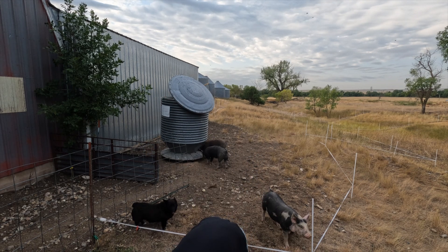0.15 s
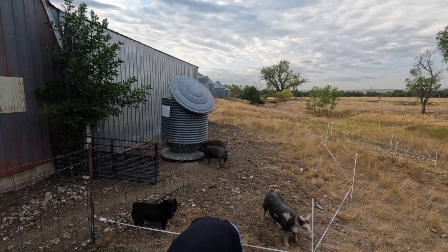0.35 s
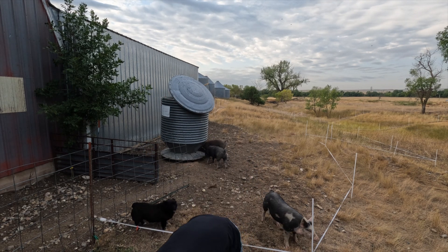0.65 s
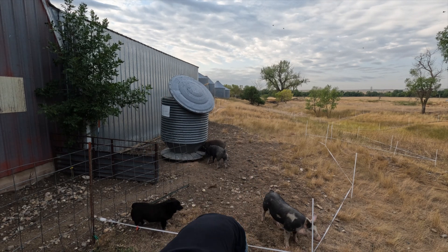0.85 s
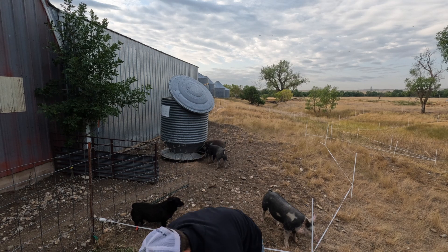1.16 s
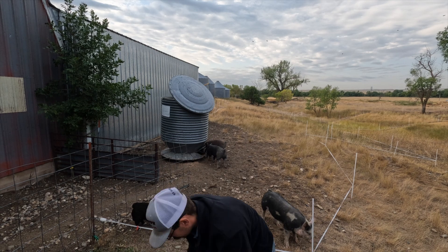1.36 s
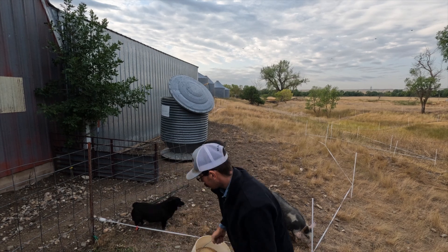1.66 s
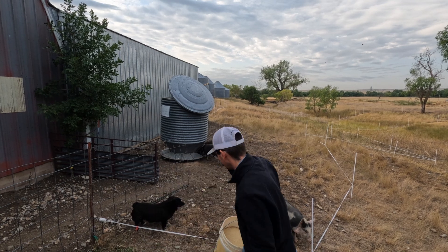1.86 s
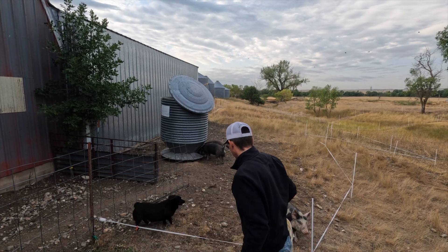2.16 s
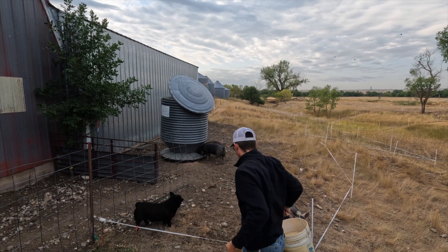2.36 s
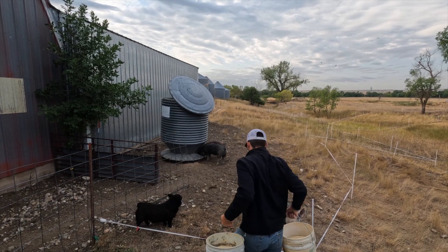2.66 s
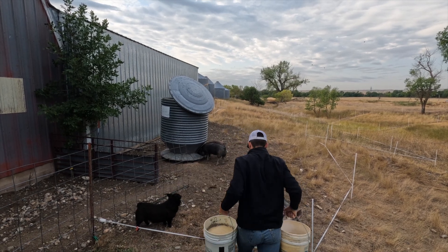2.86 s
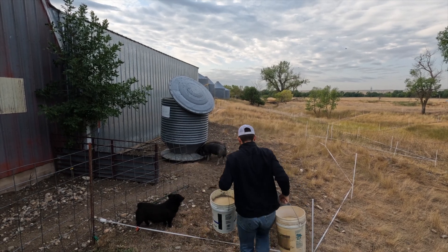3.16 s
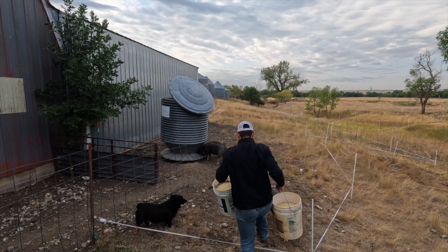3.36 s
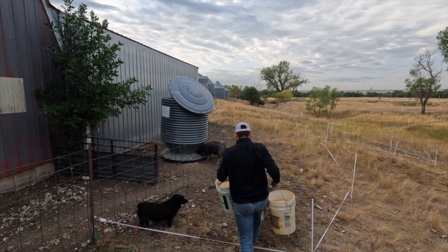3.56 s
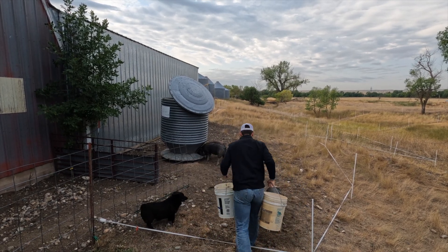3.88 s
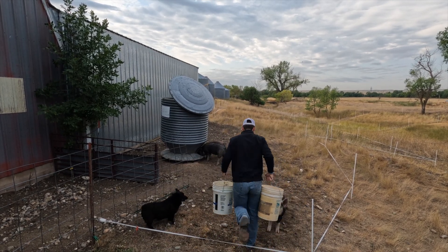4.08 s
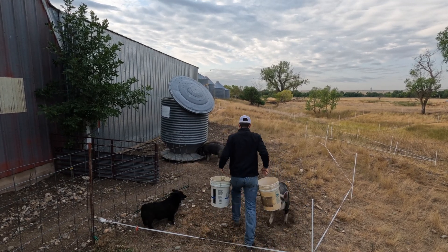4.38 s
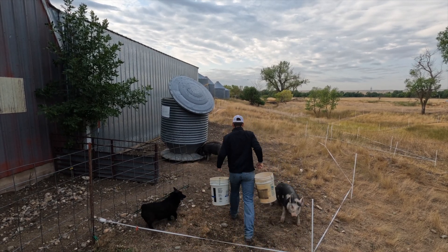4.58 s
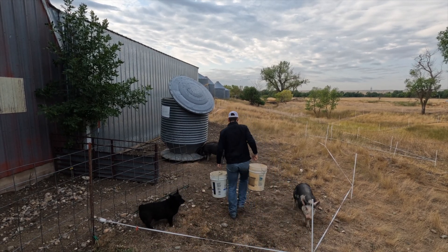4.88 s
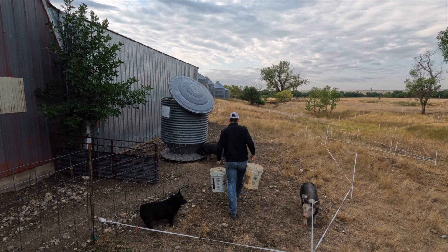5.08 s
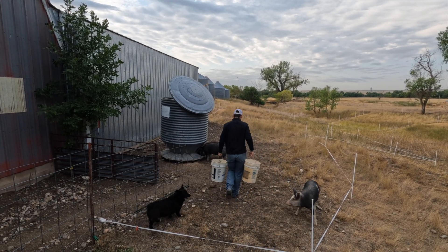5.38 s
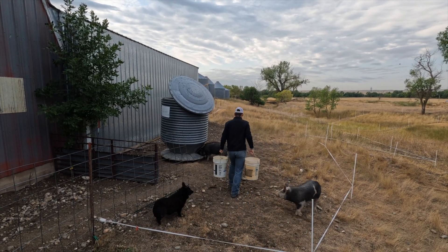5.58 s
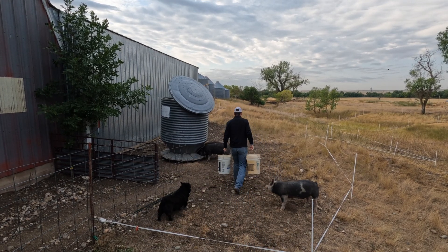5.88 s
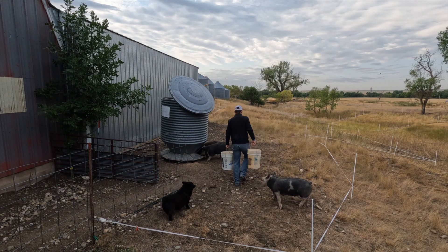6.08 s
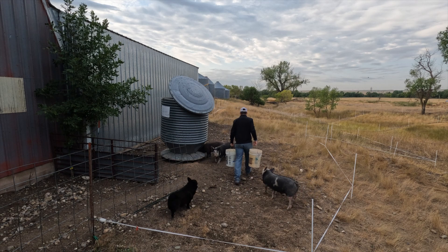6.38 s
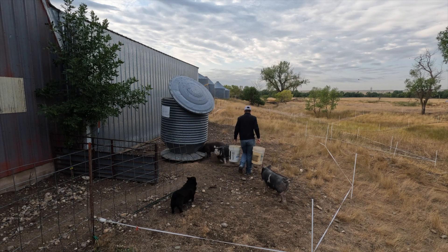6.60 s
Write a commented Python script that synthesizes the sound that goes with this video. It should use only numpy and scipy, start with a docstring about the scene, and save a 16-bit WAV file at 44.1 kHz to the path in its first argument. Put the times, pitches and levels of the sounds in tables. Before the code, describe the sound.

Outdoors beside a steel barn, low wind and faint birds come first, with soft footsteps and a pig's short dry grunts. Hollow feeder flaps clatter around one second, with a bucket knock and snout scrapes. Sparse grunts, gritty boot steps and low wind buffets follow. Near the end the feeder rattles again, a pig squeals hoarsely, and a loud metal clang rings out. The stereo microphone stays still, catching wind.

```python
"""Low wind and faint birdsong come first, then a light footstep and a pig's short rattling grunts.
Soon pigs root at a sheet-metal feeder beside a steel barn: noise bursts shake a hollow bin, then one loud clang.
Grunts are throat pulses ringing in snout and chest; boots are a snap, crunching grit and a thud.
Birds are gliding tones with echoes; wind, rumble and grass hiss are bands of coloured noise."""
import sys
import numpy as np
from scipy import signal
from scipy.io import wavfile

SR = 44100
rng = np.random.default_rng(int(sys.argv[2]) if len(sys.argv) > 2 else 0)


def output_pcm(signal):
    """Save a mono or channel-first signal as 16-bit PCM at the path in sys.argv[1].

    Samples are clipped to [-1, 1] before scaling.
    """
    pcm = np.clip(np.atleast_2d(signal).T, -1, 1) * 32767
    wavfile.write(sys.argv[1], SR, np.round(pcm).astype(np.int16))


N = 297234
T = np.arange(N) / SR   # time of every sample [s]


def from_db(db):
    """Turn decibels into a gain."""
    return 10 ** (np.asarray(db) / 20)


def rms_one(x):
    """Scale a sound to an average strength (rms) of 1."""
    return x / np.sqrt(np.mean(x ** 2) + 1e-20)


def in_time(rows):
    """Read a time table at every sample, with straight lines between its rows."""
    times, *columns = np.transpose(rows)
    return [np.interp(T, times, column) for column in columns]


def at_hz(points, hz):
    """Read a frequency table at the given pitch, with even steps per octave."""
    table_hz, *columns = np.transpose(points)
    return [np.interp(np.log(hz), np.log(table_hz), column) for column in columns]


def cut(x, hz, kind, order=2):
    """Keep only the lows, the highs or a band (Butterworth filter)."""
    sos = signal.butter(order, np.clip(hz, 10, .45 * SR), kind, fs=SR, output="sos")
    return signal.sosfilt(sos, x + 1e-18)


def drift(rate, size=N):
    """Wander at random: straight lines join chance points of spread 1, `rate` points a second."""
    points = rng.standard_normal(int(size * rate / SR) + 2)
    return np.interp(np.arange(size) * rate / SR, np.arange(len(points)), points)


def ring(x, hz, width_hz):
    """Ring at one pitch when struck, like a resonance; a wider one dies sooner."""
    radius = np.exp(-np.pi * width_hz / SR)
    angle = 2 * np.pi * hz / SR
    return signal.lfilter([0, np.sin(angle)], [1, -2 * radius * np.cos(angle), radius * radius], x + 1e-18)


def dying(t, t60):
    """Fade away smoothly, losing 60 dB in t60 seconds."""
    return np.exp(-np.log(1000) * t / t60)


def add(out, s, x):
    """Mix a sound in at its time."""
    i = int(np.clip(round(s * SR), 0, N - 1))
    out[..., i:i + x.shape[-1]] += x[..., :N - i]


def grains(size, spread_db):
    """Many tiny contacts of uneven strength, packed into a noise of rms 1."""
    strength = from_db(spread_db * np.tanh(drift(1200, size=size)))
    return rms_one(rng.standard_normal(size) * strength)


def placed(x, pan_db):
    """Lean a sound to the left (+) or right (-)."""
    return x * from_db(np.array([[pan_db], [-pan_db]]) / 2)


EDGES_HZ = 18 * 2 ** np.arange(0, 10.1, .5)   # half-octave band edges


def bands(spectrum, likeness, size):
    """Split stereo noise into half-octave bands of rms 1: (centre [Hz], gain, noise)."""
    white = rng.standard_normal((2, 2, size + SR // 4))   # the extra start lets the filters settle
    for k, (low, high) in enumerate(zip(EDGES_HZ, EDGES_HZ[1:])):
        hz = np.sqrt(low * high)
        if spectrum[0][0] < hz < spectrum[-1][0]:
            mid, side = cut(white[k % 2], [low, high], "band")[:, -size:]
            alike = np.clip(at_hz(likeness, hz)[0], -1, 1)
            pair = np.sqrt(1 + alike) * mid + np.sqrt(1 - alike) * np.array([side, -side])
            power = np.mean(from_db(at_hz(spectrum, np.linspace(low, high))[0]) ** 2)
            yield hz, np.sqrt(power * (high - low)), rms_one(pair)


# How alike left and right are in the open air: (frequency [Hz], likeness [0 to 1])
AIR_LIKENESS = [(60, 0.74), (150, 1), (400, 0.85), (1000, 0.7), (3000, 0.57), (13000, 0.61)]


def steady(spectrum, flicker_db, rate):
    """Lasting coloured stereo noise whose bands flicker separately; rms 1."""
    total = 0
    for _, gain, noise in bands(spectrum, AIR_LIKENESS, N):
        total = total + gain * from_db(flicker_db * drift(rate)) * noise
    return rms_one(total)


# Colour of the low rumble: (frequency [Hz], level per Hz [dB])
RUMBLE_COLOUR = [(90, -4), (140, 1.5), (250, -8.5), (380, -16), (550, -24)]
# Colour of the dry grass hiss: (frequency [Hz], level per Hz [dB])
GRASS_COLOUR = [(400, -9), (600, -4), (850, -54), (1100, -2.5), (1800, -11), (2600, -6.5), (4000, -11),
                (7200, -15), (8300, -46), (15000, -20)]


def pasture():
    """A low rumble grows with the breeze, over a lightly flickering hiss of dry grass."""
    rumble_db = -32 + 0.47 * in_time(BREEZE_STRENGTH)[0]
    rumble = from_db(rumble_db) * steady(RUMBLE_COLOUR, flicker_db=4.0, rate=13)
    hiss = cut(steady(GRASS_COLOUR, flicker_db=2.5, rate=24), 13500, "low")
    return rumble + from_db(-60.0) * hiss


# Strength of the breeze, before gain: (time [s], level [dB])
BREEZE_STRENGTH = [(0.0, -46), (1.11, -42), (1.18, -39), (2.25, -37), (2.5, -45), (3.04, -39.5),
                   (4.39, -49), (5.56, -36.5), (6.74, -35.5)]
# Colour of wind at the microphone: (frequency [Hz], level per Hz [dB])
WIND_COLOUR = [(17, 7), (50, 5), (80, -10.5), (130, -11)]
BREEZE_GAIN_DB = 3


def breeze():
    """Swirls of air at the microphone make a lumpy bed of low noise."""
    level_db = in_time(BREEZE_STRENGTH)[0] + BREEZE_GAIN_DB
    return from_db(level_db) * steady(WIND_COLOUR, flicker_db=5.5, rate=8.5)


# Gusts striking the microphone: (time at the middle [s], level [dB], upper edge [Hz])
GUSTS = [(0.693, -39, 109), (2.327, -29.5, 61.7), (2.707, -28, 55), (3.093, -27, 55), (3.241, -32, 64),
         (3.48, -32.5, 69.5), (5.345, -26, 59.6), (5.448, -18.5, 98)]
GUST_S = 0.021   # spread of each bell-shaped swell


def gusts():
    """Single buffets on the microphone: brief swells of very low noise."""
    out, t = np.zeros(N), T[:SR // 2] - 1 / 4
    shape = np.exp(-(t / GUST_S) ** 2 / 2)
    for s, db, edge_hz in GUSTS:
        eddy = cut(cut(rng.standard_normal(len(t)), edge_hz, "low", order=3), 8.6, "high")
        add(out, s - 1 / 4, from_db(db) * rms_one(eddy * shape) * np.sqrt(np.mean(shape ** 2)))
    return out


def glides(rows):
    """Gliding tones with a fast, uneven trill in pitch and a slightly wavering level."""
    out = np.zeros(N)
    for s, length, start_hz, end_hz, db, warble in rows:
        u = np.linspace(0, 1, int(length * SR))   # progress through the note
        trill = np.sin(2 * np.pi * 85 * u * length + drift(61.3, size=len(u))) + 0.6 * drift(604, size=len(u))
        hz = start_hz * (end_hz / start_hz) ** u * (1 + warble * trill)
        swell = np.sqrt(np.abs(np.sin(np.pi * u))) * from_db(3.3 * drift(73.4, size=len(u)))
        add(out, s, from_db(db) * np.sqrt(2) * swell * np.sin(2 * np.pi * np.cumsum(hz) / SR))
    return out


# One bird's sinking whistles: (time [s], length [s], start pitch [Hz], level [dB])
WHISTLES = [(0.145, 0.35, 3183, -66.5), (0.717, 0.18, 3050, -62), (3.397, 0.22, 3227, -69),
            (4.098, 0.052, 3320, -60), (4.722, 0.212, 3280, -63), (4.911, 0.15, 3045, -62.5)]
WHISTLE_SAG_HZ_PER_S2 = 2200   # the drop grows with the square of the length
# Another bird's short falling chirps: (time [s], length [s], top pitch [Hz], level [dB])
CHIRPS = [(0.242, 0.06, 4500, -69.5), (1.599, 0.076, 4356, -54), (1.671, 0.042, 3920, -60),
          (2.902, 0.06, 5570, -65.5), (4.387, 0.024, 5000, -61)]
CHIRP_FALL_OCTAVES_PER_S = 4
FULL_CHIRP_S = 0.13   # a chirp this long has the full warble
# Its flutters, trilling widely around a steady pitch: (time [s], length [s], pitch [Hz], level [dB])
FLUTTERS = [(.275, 0.059, 3900, -69), (.4, 0.054, 3290, -63), (2.067, .055, 3900, -61.5),
            (3.683, 0.079, 3950, -67), (5.42, 0.073, 3850, -64.5)]
# Notes of its quick twitter: (time after the start [s], length [s], start [Hz], end [Hz], relative level [dB])
TWITTER_NOTES = [(0, .055, 5240, 4830, -3), (.01, .075, 4500, 3456, 0), (.025, .03, 3150, 3600, 1),
                 (0.077, 0.0505, 3250, 2950, -4)]
# When it twitters: (time [s], level [dB])
TWITTERS = [(1.828, -52), (4.131, -53), (5.755, -58)]
# Warbles, as a share of pitch
WHISTLE_WARBLE, CHIRP_WARBLE, FLUTTER_WARBLE, TWITTER_WARBLE = 0.015, 0.1, 0.088, 0.044


def song():
    """Whistles sink, chirps fall and trill wider when longer, flutters stay level, twitters repeat a phrase."""
    notes = []
    for s, length, hz, db in WHISTLES:
        notes.append((s, length, hz, hz - WHISTLE_SAG_HZ_PER_S2 * length ** 2, db, WHISTLE_WARBLE))
    for s, length, hz, db in CHIRPS:
        end_hz = hz / 2 ** (CHIRP_FALL_OCTAVES_PER_S * length)
        notes.append((s, length, hz, end_hz, db, CHIRP_WARBLE * (length / FULL_CHIRP_S) ** 2))
    for s, length, hz, db in FLUTTERS:
        notes.append((s, length, hz, hz, db, FLUTTER_WARBLE))
    for s, db in TWITTERS:
        for delay, length, start_hz, end_hz, note_db in TWITTER_NOTES:
            notes.append((s + delay, length, start_hz, end_hz, db + note_db, TWITTER_WARBLE))
    return glides(notes)


def birds():
    """Far birdsong, smeared by echoes from the barn: a fading burst of noise stands for the echoes."""
    calls = song()
    mid, side = rng.standard_normal((2, SR)) * dying(T[:SR], .32)
    echoes = rms_one(mid + 0.65 * np.array([side, -side])) / np.sqrt(SR)
    return calls + from_db(4.5) * signal.fftconvolve(calls[None], echoes)[:, :N]


# Legs and boots brush through dry grass: (time at the middle [s], length [s], level [dB])
SWISHES = [(2.678, 0.0086, -53), (4.019, 0.03, -54), (4.348, 0.052, -55), (5.284, 0.047, -59)]


def swishes():
    """Dry stalks rub in a soft swell of grains."""
    out, t = np.zeros(N), T[:SR // 2] - 1 / 4
    for s, length, db in SWISHES:
        rustle = rms_one(cut(cut(grains(len(t), 2.9), [600, 5000], "band", order=1), 5900, "low"))
        add(out, s - 1 / 4, from_db(db) * rustle * np.exp(-(t / length) ** 2))
    return out


# Boots and hooves on grit, and a bucket knock at 1.011 s: (time of the snap [s], level [dB], pitch [Hz])
STEPS_AND_KNOCK = [(0.178, -41, 3600), (0.542, -42.5, 5000), (.599, -46, 6500), (.719, -43.5, 5430),
                   (1.011, -24.5, 550), (1.087, -35.5, 3000), (2.333, -45.5, 4000), (2.873, -41, 2620),
                   (4.55, -26, 890), (4.568, -35.5, 1510), (4.63, -35.5, 2520), (4.748, -30.5, 5500),
                   (4.844, -34, 5600), (5.22, -36, 640), (5.317, -27.5, 600)]
CRUNCH_DB, ORDINARY_STEP_DB = -19.5, -44   # grit against the snap in an ordinary step, and that step's level
CRUNCH_LAG = 0.22   # a harder step is mostly snap: dB less crunch per dB
CRUNCH_RISE_S, CRUNCH_S = 0.017, 0.059   # grit starts to give just before the snap


def steps_and_knock():
    """A step is a stone or stalk snapping, crunching grit and a dull thud; a bucket knock is made the same way."""
    out, t = np.zeros(N), T[:SR // 3] - 1 / 20
    after = np.maximum(t, 0)
    press = np.exp(-(t / np.where(t < 0, CRUNCH_RISE_S, CRUNCH_S)) ** 2)
    for s, db, hz in STEPS_AND_KNOCK:
        crunch_db = CRUNCH_DB - CRUNCH_LAG * (db - ORDINARY_STEP_DB)
        snap = rng.standard_normal(len(t)) * (t >= 0) * dying(after, 0.0072)
        force = snap + from_db(crunch_db) * grains(len(t), 0.92) * press
        sound = cut(cut(force, [hz / 2.4, hz * 1.13], "band", order=1), min(6 * hz, 8500), "low", order=3)
        thud = rms_one(cut(rng.standard_normal(len(t)), [130, 400], "band")) * (t >= 0) * dying(after, 0.16)
        add(out, s + t[0], from_db(db) * (sound / np.abs(sound).max() + from_db(-11.5) * thud))
    return out


# Grunts: (time [s], length [s], pulses per second [1/s], snout pitch [Hz], snout level [dB], chest level [dB])
GRUNTS = [(0.42, .02, 30, 1560, -37, -59), (0.491, 0.077, 25, 1500, -35, -60),
          (0.586, 0.054, 65, 1360, -33, -67), (1.086, .02, 36, 1530, -25.5, -22.5),
          (1.975, 0.09, 37.5, 1960, -36.5, -26.5), (3.551, 0.13, 37, 1780, -35.5, -21.5),
          (6.186, 0.081, 114, 1450, -29, -42)]
# Snout resonances: (ratio to the snout's pitch, width [Hz], relative level [dB])
SNOUT = [(.62, 354, -5), (1, 325, 0), (1.15, 357, 0.5)]
# Chest resonances: (frequency [Hz], width [Hz], relative level [dB])
CHEST = [(162.5, 14, -8), (282, 78, -8)]
GRUNT_UNEVEN_DB = 1   # chance differences between throat pulses
SNOUT_WOBBLE = 0.084   # the snout changes shape from pulse to pulse: share of its pitch


def grunts():
    """Separate throat pulses ring in the chest and a shape-changing snout, swelling and fading in each grunt."""
    snout, chest, t = np.zeros(N), np.zeros(N), T[:SR // 20]
    for s, length, rate, snout_hz, snout_db, chest_db in GRUNTS:
        unevenness = rng.standard_normal(int(length * rate) + 2)
        for delay, chance in zip(np.arange(0, length, 1 / rate), unevenness):
            progress = (delay + .5 / rate) / max(length, 1 / rate)
            effort = from_db(GRUNT_UNEVEN_DB * chance - 14 * (1 - 2 * progress) ** 2)
            # a click plus a little noise
            pulse = 0.097 * rng.standard_normal(len(t)) * dying(t, 0.074) + (t == 0)
            hz = snout_hz * (1 + SNOUT_WOBBLE * rng.standard_normal())
            knock = 0
            for k, (ratio, width_hz, db) in enumerate(SNOUT):
                knock = knock + (-1) ** k * from_db(db) * ring(pulse, ratio * hz, width_hz)
            add(snout, s + delay, from_db(snout_db) * effort * knock)
            add(chest, s + delay, from_db(chest_db) * effort * (t == 0))
    body = sum((-1) ** k * from_db(db) * ring(chest, hz, width_hz) for k, (hz, width_hz, db) in enumerate(CHEST))
    return cut(snout + body, 3400, "low", order=4)   # soft flesh swallows the treble


# How alike left and right are in metal blows: (frequency [Hz], likeness [0 to 1])
BLOW_LIKENESS = [(150, 1), (1000, 0.98), (4000, 0.86), (8000, 0.73), (13000, 0.077)]


def panel(spectrum, rings, blow_t60):
    """Sheet steel when struck: crowded tones give a short crash, then a ring that fades at its own pace by pitch."""
    t, out = T[:SR], 0
    for hz, gain, noise in bands(spectrum, BLOW_LIKENESS, SR):
        ring_db, t60 = at_hz(rings, hz)
        crash = rms_one(noise * dying(t, blow_t60))
        swell = 1 - dying(t, blow_t60)
        ringing = rms_one(noise * swell * dying(t, t60))
        out = out + gain * rms_one(crash + from_db(ring_db) * ringing)
    return rms_one(out) / np.sqrt(SR)


def zing(x, peaks):
    """Resonances lift narrow parts of the spectrum."""
    out = x
    for hz, width_hz, db in peaks:
        out = out + from_db(db) * signal.lfilter(*signal.iirpeak(hz, hz / width_hz, fs=SR), x + 1e-18)
    return out


def coloured(burst, bass_hz, treble_hz, bass_db, treble_db):
    """Set bass and treble apart: a heavy contact has more bass, a hard one more treble."""
    bass, rest = cut(burst, bass_hz, "low", order=3), cut(burst, bass_hz, "high", order=3)
    middle, treble = cut(rest, treble_hz, "low", order=3), cut(rest, treble_hz, "high", order=3)
    return from_db(bass_db) * bass + middle + from_db(treble_db) * treble


RATTLE_DB, RATTLES_PER_S = 0.95, 160   # loose metal chatters unevenly within a blow


def clatter(rows, bass_hz, treble_hz, spread_db, snap):
    """Each blow is one sharp contact and an unevenly rattling burst of smaller ones."""
    out, t = np.zeros(N), T[:SR // 2]
    for s, db, length, bass_db, treble_db in rows:
        rattle = from_db(RATTLE_DB * drift(RATTLES_PER_S, size=len(t)))
        burst = snap * (t == 0) + grains(len(t), spread_db) * rattle * np.exp(-(t / length) ** 2)
        add(out, s, from_db(db) * coloured(burst, bass_hz, treble_hz, bass_db, treble_db))
    return out


# The loud clang and its rattle: (time [s], level [dB], clatter length [s], bass [dB], treble [dB])
CLANGS = [(6.53, -7.5, 0.0063, 0.5, -10), (6.538, -22.5, 0.033, 11, 5.5), (6.594, -26.5, 0.13, 2, -6),
          (6.669, -32, 0.041, -16, 1.5)]
# Colour of the struck sheet: (frequency [Hz], level per Hz [dB])
SHEET_COLOUR = [(100, -3.5), (250, -11.5), (380, -20), (520, -22.5), (780, -16), (2100, -16), (4300, -15.5),
                (5600, -22), (7400, -14.5), (10000, -32.5), (13000, -57)]
# Its lingering ring: (frequency [Hz], ring against blow [dB], time to fade 60 dB [s])
SHEET_RING = [(102, -9.5, 0.26), (510, 8, 2.5), (2010, 2, 0.64), (4500, 8.5, 0.19), (8850, -19, 1.4)]
# Its bright resonances: (frequency [Hz], width [Hz], lift [dB])
SHEET_PEAKS = [(7170, 490, -2)]
# Its single singing tones: (frequency [Hz], level [dB])
SHEET_TONES = [(521.5, -31.5), (673.5, -36.5), (1618, -40), (2075, -30.5), (2596, -39), (2922, -35),
               (3444, -33.5), (4634, -33.5), (7600, -37)]
SHEET_TONE_T60_S = 1.8
# The whole wall flexing: (frequency [Hz], level [dB], time to fade 60 dB [s])
WALL_BOOM = [(48.5, -20, 0.43), (70.6, -13.5, 0.25), (262, -5.5, 0.037)]


def clang():
    """A hard slam rattles a steel sheet, each blow on another spot; single tones sing on and the wall booms."""
    out, t = np.zeros((2, N)), T[:SR]
    for s, *blow in CLANGS:
        force = clatter([(0, *blow)], bass_hz=358, treble_hz=5000, spread_db=5.5, snap=8.8)[:SR // 2]
        response = zing(panel(SHEET_COLOUR, SHEET_RING, blow_t60=0.021), SHEET_PEAKS)
        struck = signal.fftconvolve(force[None], response)
        add(out, s, from_db(2.0) * cut(struck, 10900, "low", order=4))
    tones = sum(from_db(db) * np.sin(2 * np.pi * (hz * t + rng.random())) for hz, db in SHEET_TONES)
    boom = sum(from_db(db) * dying(t, t60) * np.sin(2 * np.pi * hz * t) for hz, db, t60 in WALL_BOOM)
    add(out, 6.531, tones * dying(t, SHEET_TONE_T60_S) + boom)
    return out


# Snouts rub along the feeder; the row at 2.039 s is a soft noise burst just after a grunt, and the row
# at 6.508 s a short noise swell leading into the clang: (time [s], level [dB], length [s], treble [dB])
RUBS_AND_SWELLS = [(0.896, -37.5, 0.053, -11), (0.936, -44, 0.12, -1), (1.291, -37, 0.16, -3.5),
                   (1.774, -41, 0.06, -2), (2.039, -43, 0.042, -7), (2.467, -45, 0.17, -27),
                   (5.679, -43, 0.26, -17), (5.95, -48, 1, -6.5), (6.271, -46, 0.84, -5.5),
                   (6.508, -26.5, 0.026, 4.5)]
RUB_BASS_DB = 2
RUB_RISE_S, RUB_JERK_DB, RUB_JERKS_PER_S = 0.0087, 3.5, 90   # each rises quickly, then jerks unevenly


def rubs_and_swells():
    """A snout takes hold of the metal and scrapes in uneven jerks; two other noise swells are made the same way."""
    out, t = np.zeros(N), T[:SR // 2]
    for s, db, length, treble_db in RUBS_AND_SWELLS:
        jerks = from_db(RUB_JERK_DB * drift(RUB_JERKS_PER_S, size=len(t)))
        push = (1 - np.exp(-t / RUB_RISE_S)) * np.exp(-(t / length) ** 2) * jerks
        add(out, s, from_db(db) * coloured(grains(len(t), 9.0) * push, 490, 3400, RUB_BASS_DB, treble_db))
    return out


# Feeder flaps fall; the row at 1.01 s is no flap but lends the bucket knock a ring in the bin: # (time [s],
# level [dB], clatter length [s], bass [dB], treble [dB], own note [Hz], note against clatter [dB])
FLAPS = [(0.873, -33, 0.0089, 2, -18, 1740, 4), (1.01, -30.5, 0.0078, 2.5, -24, 647, 11),
         (1.207, -28, 0.042, 1, 7.5, 1890, 12), (1.446, -24, 0.072, 4.5, 5.5, 2030, 9.5),
         (2.507, -27.5, 0.018, 3.5, -2.5, 1530, 6.5), (3.043, -25.5, 0.033, 0, -1.5, 1344, 5),
         (5.724, -35.5, 0.026, -8, 4.5, 960, 9), (5.896, -37, 0.053, 11, 1.5, 986, 9),
         (6.342, -35, 0.028, 5, 1, 1270, 5), (6.443, -33.5, 0.048, -4, 5.5, 1920, 2)]
# Light ticks of a flap's edge: (time [s], level [dB])
TICKS = [(0.94, -45), (.982, -36.5), (1.335, -44), (1.372, -48), (1.674, -36.5), (5.99, -40.5)]
TICK_LENGTH_S, TICK_BASS_DB, TICK_TREBLE_DB = 0.0089, -14, 4.5
REBOUND_S, REBOUND_LOSS_DB, REBOUND_LENGTH_S = .025, 12, 0.016   # every flap lands a second time
REBOUND_BASS_DB, REBOUND_TREBLE_DB = 8.5, -5   # added to the colour of its first blow


def feeder_contacts():
    """List falls, rebounds and ticks: (time [s], level [dB], length [s], bass [dB], treble [dB])."""
    falls = [flap[:5] for flap in FLAPS]
    rebounds = [(s + REBOUND_S, db - REBOUND_LOSS_DB, REBOUND_LENGTH_S,
                 bass_db + REBOUND_BASS_DB, treble_db + REBOUND_TREBLE_DB)
                for s, db, _, bass_db, treble_db in falls]
    ticks = [(s, db, TICK_LENGTH_S, TICK_BASS_DB, TICK_TREBLE_DB) for s, db in TICKS]
    return falls + rebounds + ticks


FLAP_RING_Q = 8.6   # pitch over width: each flap's own note is broad and short


def flap_notes():
    """While it clatters, each flap rings at a pitch of its own."""
    out, t = np.zeros(N), T[:SR // 4]
    for s, db, length, _, _, note_hz, note_db in FLAPS:
        width_hz = note_hz / FLAP_RING_Q
        burst = grains(len(t), 11.0) * np.exp(-(t / (0.68 * length)) ** 2)
        note = ring(burst, note_hz, width_hz) * 2 * np.pi * width_hz / SR
        add(out, s, from_db(db + note_db) * note)
    return out


# Colour of the bin under a flap: (frequency [Hz], level per Hz [dB])
BIN_COLOUR = [(95, -10), (138, 4), (178, -2.5), (225, -6), (543, -12.5), (663, -19), (718, -8),
              (2020, -15.5), (4040, -20), (5450, -22.5), (7340, -29), (10500, -29.5), (13000, -53)]
# Its lingering ring: (frequency [Hz], ring against blow [dB], time to fade 60 dB [s])
BIN_RING = [(150, 0, 1.35), (500, 12, 1.2), (1110, 2, 0.46), (3140, -7.5, 0.34), (8000, -22, 0.98)]
# The flaps' bright zing: (frequency [Hz], width [Hz], lift [dB])
BIN_PEAKS = [(5500, 250, -7), (7000, 380, 2.5)]
# Short squeaky tones: hinges, a bird's high note at 5.765 s and a pig's hoarse squeal at 6.185 s:
# (time [s], length [s], pitch [Hz], level [dB])
SQUEAKY_TONES = [(5.716, 0.12, 960, -55), (5.765, 0.023, 5000, -50), (6.073, 0.027, 2620, -53.5),
                 (6.185, 0.053, 948, -39.5), (6.39, 0.085, 4890, -50)]
SQUEAKY_WARBLE_HZ = 60.3


def flaps_and_squeaky_tones():
    """Flaps, rubs and noise swells ring in the hollow bin; short squeaky tones are added without it."""
    blows = clatter(feeder_contacts(), bass_hz=503, treble_hz=2870, spread_db=5.5, snap=4.8)
    force = blows + flap_notes() + rubs_and_swells()
    response = zing(panel(BIN_COLOUR, BIN_RING, blow_t60=0.027), BIN_PEAKS)
    sound = signal.fftconvolve(force[None], response)[:, :N]
    tones = glides([(s, length, hz, hz, db, SQUEAKY_WARBLE_HZ / hz) for s, length, hz, db in SQUEAKY_TONES])
    return from_db(1.0) * cut(sound, 10350, "low", order=4) + tones


def scene():
    """Mix the open air, the animals and the feeder; the clang's treble leans left."""
    air = pasture() + placed(breeze(), pan_db=-1.1) + placed(gusts(), pan_db=-5.5)
    field = placed(birds() + swishes() + steps_and_knock(), pan_db=2.0)
    pig = placed(grunts(), pan_db=-2.0)
    slam = clang()
    dull = cut(slam, 4900, "low", order=1)
    slam_placed = placed(dull, pan_db=-1.0) + placed(slam - dull, pan_db=3.0)
    return air + field + pig + slam_placed + flaps_and_squeaky_tones()


def record(dry):
    """Round off the peaks and cut the very top of the treble."""
    top_cut = signal.ellip(10, .1, 80, 15400, fs=SR, output="sos")   # edge at 15400 Hz
    return signal.sosfilt(top_cut, np.tanh(dry))


dry = scene()
out = record(dry)
output_pcm(out)
```